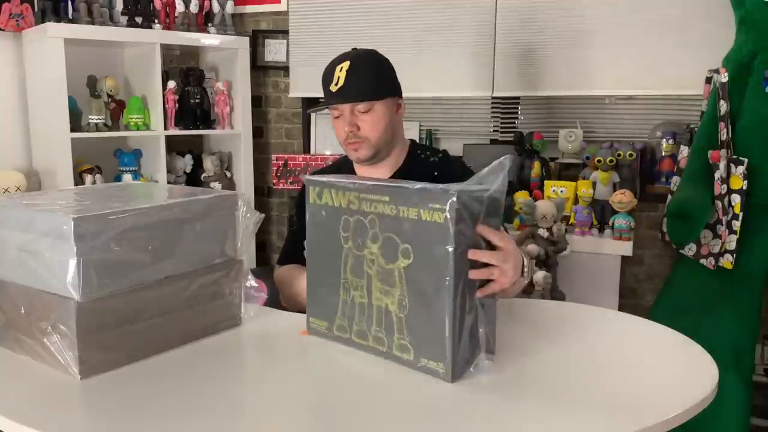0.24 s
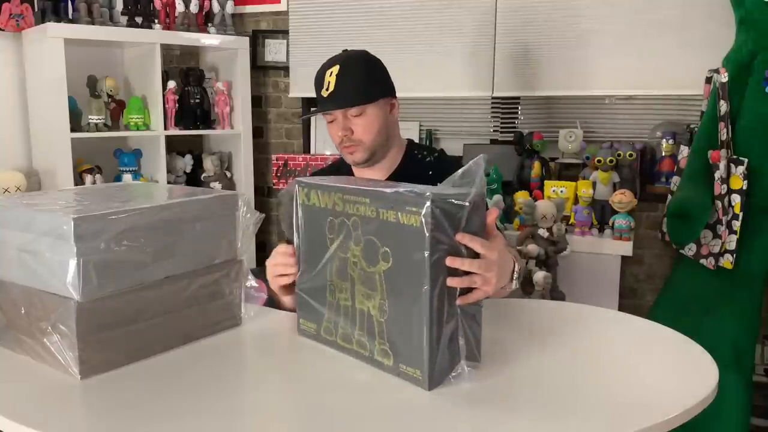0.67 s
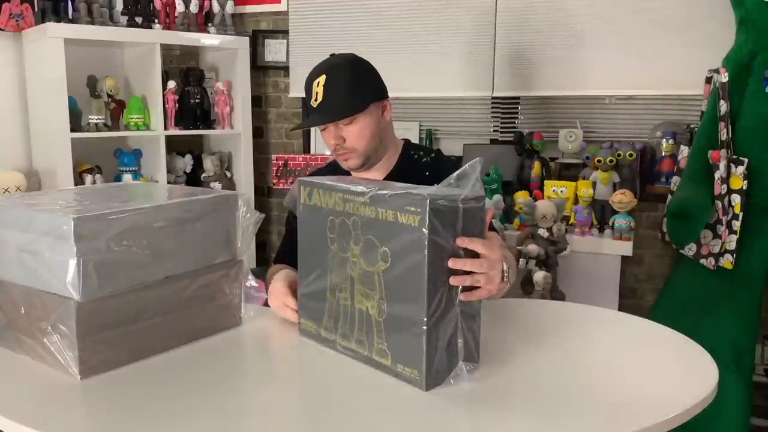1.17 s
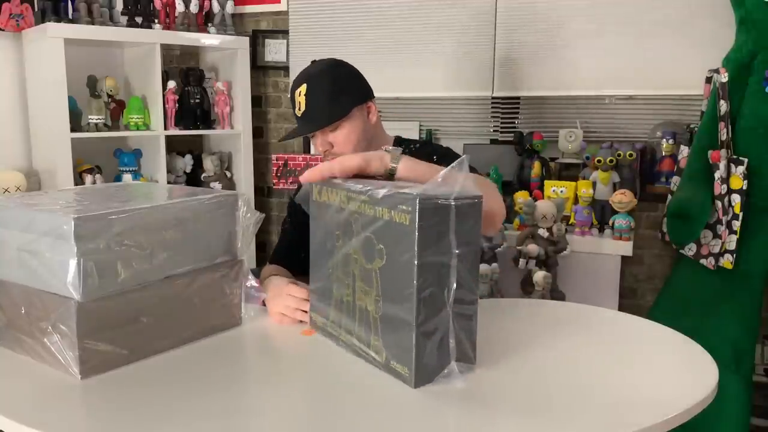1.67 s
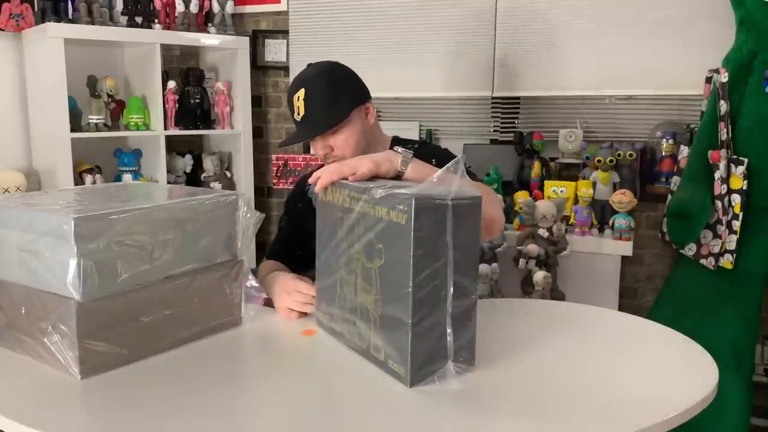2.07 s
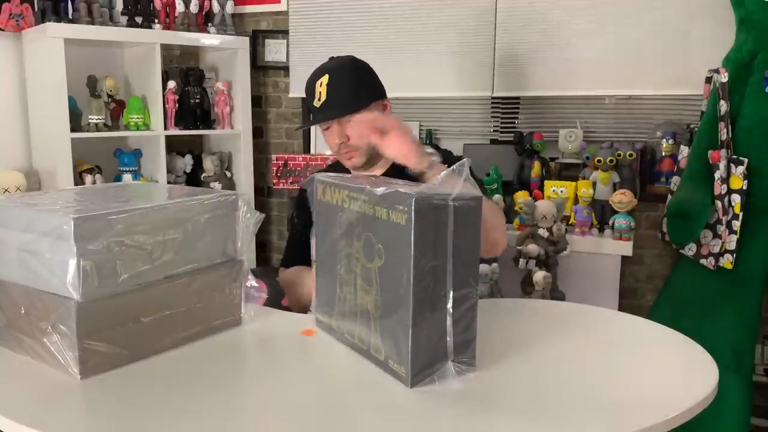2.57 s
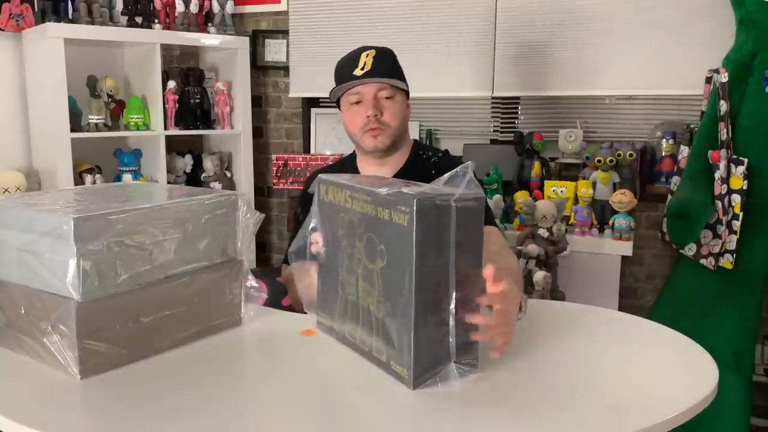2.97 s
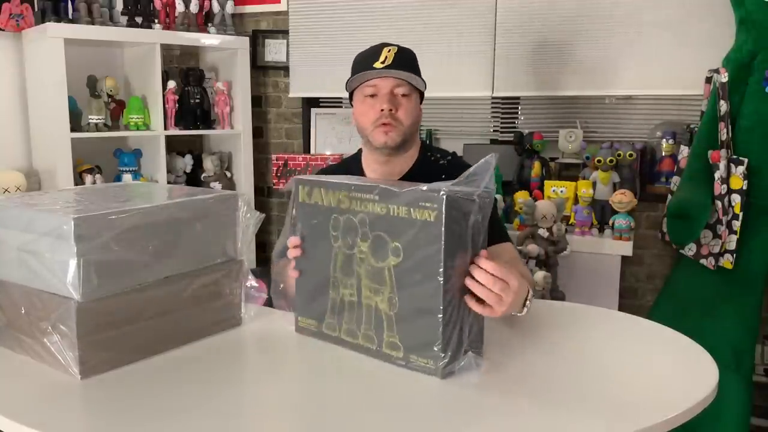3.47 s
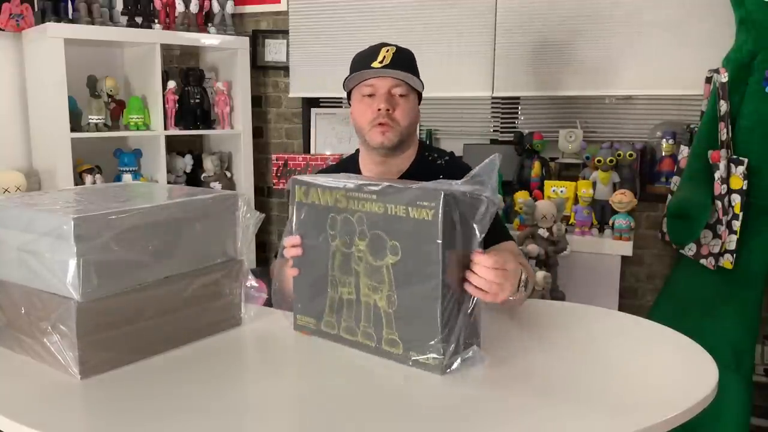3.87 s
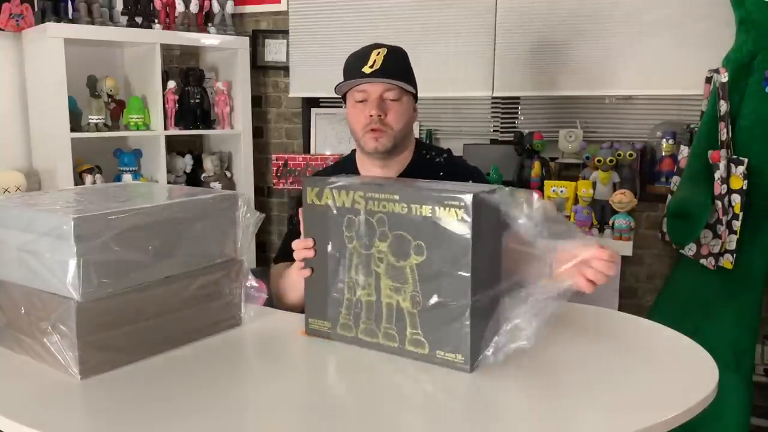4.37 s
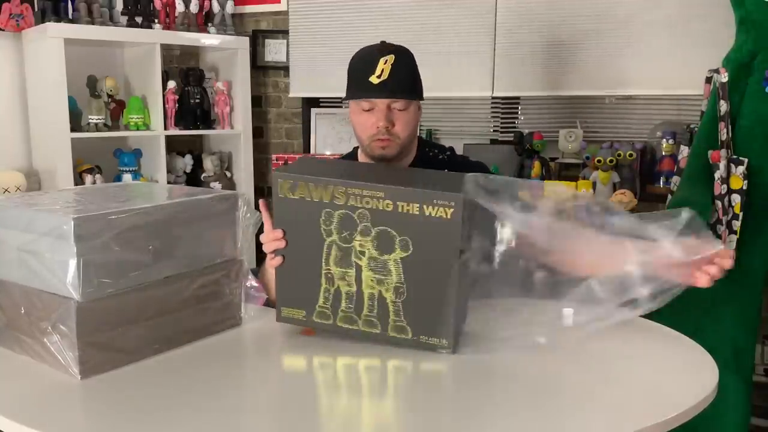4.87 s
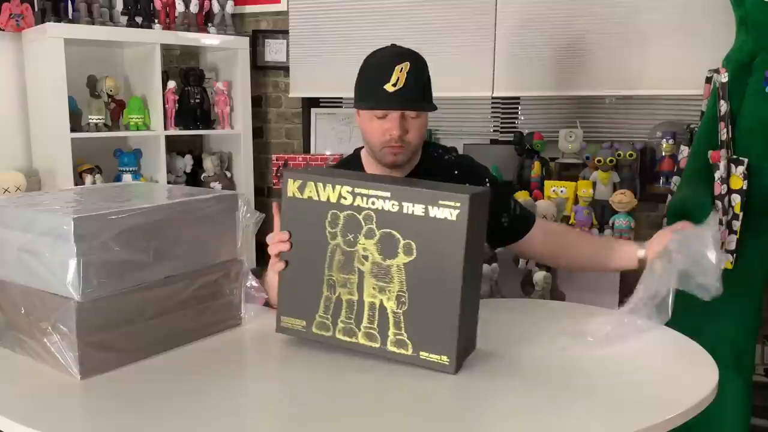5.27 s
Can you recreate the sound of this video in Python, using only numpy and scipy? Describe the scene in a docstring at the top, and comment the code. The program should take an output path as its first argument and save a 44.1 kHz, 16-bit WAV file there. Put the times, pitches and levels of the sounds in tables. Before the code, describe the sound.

Thin clear plastic crinkles and snaps around a cardboard box that thuds on a table, sharp cracks midway, then two long rustling pulls.

```python
"""Close stereo microphones at a table in a small room, over low ventilation rumble and a faint mains hum.
At once a large cardboard box is turned: it knocks on the table and booms softly under the hands.
Its clear plastic bag crinkles in tiny buckles, hisses in fine creases and snaps as its folds flip.
Just after 2 s a run of sharp, hard cracks rings out; from 4 s the bag is drawn off in two long pulls, with
one more crack between them. The rustle thins out and two last knocks, close together, end the scene."""
import sys
import numpy as np
from scipy import signal
from scipy.fft import rfft, irfft, next_fast_len
from scipy.io import wavfile
from scipy.ndimage import map_coordinates

SR = 44100
rng = np.random.default_rng(int(sys.argv[2]) if len(sys.argv) > 2 else 0)


def waveform_to_disk(signal):
    """Save audio, clipped to [-1, 1], as 16-bit WAV at the path in sys.argv[1]."""
    frames = np.transpose(np.atleast_2d(signal))
    scaled = np.clip(frames, -1, 1) * 32767
    samples = np.round(scaled).astype(np.int16)
    wavfile.write(sys.argv[1], SR, samples)


N = 244314  # samples

# Layer levels called "level before trim" are lowered by a fixed trim in the function that uses them.

# ventilation rumble, spectrum shape: pitch_hz [Hz], level_db [dB]
AIR_SPECTRUM = [(12, -54), (20, -10.5), (65, 3.5), (107, -3.5), (142, -8), (210, -5), (285, -6.5),
                (328, -9.5), (446, -12.5), (780, -21), (1060, -17.5), (1370, -25.5), (14700, -60),
                (16000, -65)]

# hands shifting their grip on the bag: start_s [s], length_s [s], crinkle_db [dB, level before trim],
# fizz_db [dB relative to the crinkle]
GRIP_EVENTS = [(0.0, 0.29, -49.5, 1), (0.383, 0.38, -55.5, 1), (0.57, 0.18, -52, -9), (0.784, .08, -49, 0),
               (0.918, 0.17, -51.5, 4), (1.087, 0.15, -48, -0.5), (1.185, 0.072, -50, 5.5),
               (1.337, 0.05, -47.5, -1.5), (1.475, .12, -57, -1.5), (1.616, 0.28, -54, -1),
               (1.767, 0.18, -55.5, -17), (2.014, 0.13, -48, -8), (2.109, 0.2, -50, -4.5),
               (2.173, 0.03, -45, 2), (2.246, 0.07, -37, -25), (2.662, 0.09, -58, -8),
               (2.999, 0.26, -57.5, -2), (3.205, 0.44, -54.5, -3.5), (3.368, 0.12, -46.5, -2),
               (3.492, 0.12, -53.5, -6), (3.69, 0.096, -46.5, -3), (3.769, 0.2, -50.5, -0.5),
               (5.15, 0.2, -53, -1.5), (5.354, 0.19, -56.5, 1.5)]
# the bag drawn off in two long pulls: time_s [s], crinkle_db [dB, level before trim],
# fizz_db and rub_db [dB relative to the crinkle]
FIRST_PULL_CURVE = [(3.96, -52, -8, 0.5), (4.03, -45.5, -1, -1.5), (4.085, -38, -3, -3),
                    (4.14, -40.5, -2, -1), (4.209, -41.5, 0.5, -5), (4.28, -41.5, -3, 0),
                    (4.419, -49, 6, -2)]
SECOND_PULL_CURVE = [(4.5, -42, 2, -5), (4.59, -47.5, -2.5, 0), (4.68, -41, -1.5, -4),
                     (4.875, -33, -1.5, -3), (5.005, -32, -6, -2.5), (5.05, -42.5, -4, 3.5),
                     (5.09, -55, 1, -3), (5.17, -58, -3, -12)]
# spectrum shapes of wide folds, fine creases and film rubbing on cardboard: pitch_hz [Hz], level_db [dB]
FOLD_SPECTRUM = [(200, -59), (700, -0.5), (1500, -1.5), (2800, -2), (4500, -2), (7000, -1), (10000, -45),
                 (16000, -27)]
FIZZ_SPECTRUM = [(1500, -22.5), (4500, -2.5), (7000, -8), (8300, 0.5), (10000, -2), (13000, 1), (14600, -3),
                 (16000, 0.5)]
RUB_SPECTRUM = [(60, -17), (120, -10), (160, -1), (210, 1.5), (290, -1.5), (420, -4.5), (560, -5.5),
                (750, -8.5), (1150, -9.5), (2500, -29.5), (6000, -45)]

# the box meeting the table: start_s [s], box_db [dB], favoured_hz [Hz], table_db [dB], clack_db [dB]
KNOCK_EVENTS = [(0.0155, -10.5, 239, -38, -22), (0.03, -12, 225, -43, -55), (0.074, -20.5, 255, -50, -54),
                (0.087, -37.5, 250, -45, -34.5), (0.096, -16.5, 240, -36, -33.5),
                (0.142, -26, 190, -50, -46), (0.196, -33, 235, -61, -59), (0.371, -31, 250, -45, -44),
                (0.816, -37.5, 223, -56, -39), (1.204, -29, 225, -62, -58), (1.512, -35.5, 250, -63, -43.5),
                (1.652, -39.5, 250, -54, -39.5), (1.785, -29.5, 226, -54, -42),
                (1.852, -25.5, 280, -43.5, -49), (2.1903, -28, 200, -34, -14), (2.203, -17, 180, -33, -28),
                (2.272, -23, 165, -52, -46), (2.376, -25, 190, -41, -45), (2.6242, -30, 320, -43.5, -44),
                (2.671, -30, 240, -41.5, -37.5), (4.4326, -16.5, 195, -38, -19.5),
                (5.4713, -25, 260, -32.5, -39.5), (5.484, -25.5, 220, -30.5, -38)]
# modes of the hollow box and of the table top: pitch_hz [Hz], level_db [dB], t60_s [s]
BOX_MODES = [(139, -15, 0.11), (168, -3.5, 0.096), (209, -2, 0.066), (250, 0.5, 0.077), (299.4, -1, 0.063),
             (351.5, -7.5, 0.06), (467.4, -3.5, 0.061)]
TABLE_MODES = [(542, 0.5, 0.069), (665, -4, 0.12), (751, -7.5, 0.13), (1074, -13, 0.096)]
# clack of the edge, spectrum shape: pitch_hz [Hz], level_db [dB]
CLACK_SPECTRUM = [(100, -28), (300, 5), (500, 9.5), (900, 1), (1250, 3.5), (1700, 2.5), (2400, -4),
                  (3500, -12), (6000, -18.5), (15000, -35)]

# hands and weight flexing the large panels, and the table top flexing in the deepest booms (60-80 Hz): start_s
# [s], level_db [dB, level before trim], # panel_hz [Hz], rise_s [s, time constant]
PAT_EVENTS = [(0.017, -32, 60.4, 0.0044), (2.624, -19, 179.8, 0.007), (3.046, -26.5, 191.5, 0.0018),
              (3.164, -23.5, 187, 0.017), (3.711, -28, 177, 0.0082), (4.435, -35, 69.8, 0.0019),
              (5.474, -42, 78, 0.0042)]

# the loudest creases snapping through: start_s [s], tick_db [dB], pop_db [dB], pop_hz [Hz]
SNAP_EVENTS = [(0.1347, -34, -33.5, 3640), (0.2078, -31.5, -45, 4300), (0.2457, -38.5, -40, 4030),
               (0.5122, -43.5, -36.5, 2616), (0.6656, -39.5, -47, 1690), (0.8201, -34, -38, 3800),
               (0.8287, -40, -45, 2600), (0.9433, -36, -44, 2820), (1.1078, -33.5, -48, 2500),
               (1.1366, -35, -42, 4000), (1.179, -46, -43, 2400), (1.2066, -31.5, -38.5, 3570),
               (1.3463, -32, -44, 2500), (1.3592, -46, -42.5, 2090), (1.4919, -43, -41.5, 1800),
               (1.6507, -45, -42.5, 1720), (2.0052, -58, -43, 3040), (2.0131, -36, -44, 4000),
               (2.0252, -55, -42, 2320), (2.0671, -70, -43, 2900), (2.0861, -48, -32, 2140),
               (2.107, -30.5, -41, 3720), (2.1293, -35, -45, 4100), (2.1681, -30.5, -53, 3200),
               (2.395, -44, -60, 3000), (2.7612, -47, -55, 3920), (3.06, -53, -48, 3040),
               (3.1376, -48, -55, 1600), (3.2209, -40.5, -43.5, 3600), (3.399, -38, -40, 4300),
               (3.4133, -47, -33.5, 3060), (3.4215, -47, -52, 2700), (3.4686, -34, -37.5, 4400),
               (3.4987, -39, -40, 4450), (3.5338, -37.5, -34.5, 2660), (3.6512, -62, -42, 3120),
               (3.7053, -38, -36, 3100), (3.7789, -34, -30, 3470), (3.8231, -34.5, -58, 3400),
               (3.9736, -40, -39, 2500), (4.0136, -42.5, -38, 2700), (4.0599, -40, -30.5, 3040),
               (4.0857, -38, -33, 2720), (4.094, -41, -36, 3300), (4.1698, -38, -36.5, 3130),
               (4.1835, -38, -52, 3300), (4.2145, -38, -51, 3500), (4.2979, -29.5, -58, 2700),
               (4.3714, -38, -46, 3500), (4.542, -36, -56, 2310), (4.6243, -41, -55, 3500),
               (4.7256, -46, -34, 3500), (4.773, -47, -50, 3500), (4.8099, -40, -44, 3500),
               (4.8715, -43, -26.5, 4160), (4.883, -38, -39, 3300), (4.966, -31, -33, 3500),
               (4.9689, -31, -26.5, 2740), (5.006, -44, -31.5, 3260), (5.073, -39.5, -44, 3300),
               (5.2354, -43, -48, 3400), (5.3691, -40, -43, 1710)]
# the sharp tick, spectrum shape: pitch_hz [Hz], level_db [dB]
TICK_SPECTRUM = [(800, -16), (2500, -19), (5000, -5.5), (9200, 3.5), (13200, 1), (16000, -2)]
# the duller pop, spectrum shape: pitch_ratio [multiple of pop_hz], level_db [dB]
POP_SPECTRUM = [(.14, -20.5), (.45, -8.5), (1, 0), (1.45, -3.5), (2.4, -16), (5, -41)]

# sharp, hard cracks, perhaps a small tool dropped on the table: start_s [s],
# clap_db [dB, level before trim], bright_hz [Hz, treble corner], rise_s [s, time constant],
# t60_s [s], ring_db [dB, level before trim]
CRACK_EVENTS = [(2.1901, -1.5, 15900, 0.00046, 0.0069, -29), (2.191, -24.5, 14000, 0.0088, 0.18, -35),
                (2.204, -17, 6000, 0.0005, 0.011, -52), (2.2639, -14, 4000, 0.0016, 0.035, -41),
                (2.2700, -7, 4370, 0.0003, 0.0083, -34), (2.2726, -7.5, 4000, 0.00037, 0.0096, -41),
                (4.4325, -12.5, 3560, 0.00036, 0.063, -54)]
# the clap of a crack, spectrum shape: pitch_hz [Hz], level_db [dB]
CRACK_SPECTRUM = [(100, -20), (450, -4), (750, 0), (1100, -8), (1450, 3.5), (1700, -3.5), (2100, 0),
                  (2550, 0), (4000, -3.5), (6500, -6), (9000, -2.5), (13500, 3.5), (16000, -3)]
# the hard, hollow ring that a crack leaves: pitch_hz [Hz], level_db [dB], t60_s [s]
CRACK_RING_MODES = [(1374, -3, 0.15), (1638, -6, 0.15), (1880, -4.5, .2), (2030, -2.5, 0.094),
                    (2555, -2.5, 0.14), (2910, -12, 0.13), (3160, -17, 0.21), (3540, -8, 0.16),
                    (3604, -4, .25), (4000, -7, 0.17), (4360, -11, .2)]

# the room's decay: pitch_hz [Hz], t60_s [s]
ROOM_DECAY = [(150, 0.33), (500, 0.28), (2000, 0.34), (6000, 0.3), (14000, 0.25)]
# the room's strength: pitch_hz [Hz], level_db [dB]
ROOM_LEVEL = [(150, 2.5), (400, -2), (1000, 1), (3000, 5.5), (8000, 3.5), (14000, -2)]
# how alike the two microphones hear diffuse sound: pitch_hz [Hz], likeness [0 to 1]
STEREO_LIKENESS = [(60, 0.91), (250, 0.94), (500, 0.54), (1000, 0.04), (2500, 0.017), (12000, 0.017)]
# left-right tilt of everything but the background: pitch_hz [Hz], pan_db [dB, left minus right]
FOREGROUND_PAN = [(300, -0.5), (1500, 2), (2500, 2), (4500, 0), (12000, -0.7)]
# fixed treble colour, a narrow gap near 11.3 kHz and a fall above 15 kHz: pitch_hz [Hz], level_db [dB]
TREBLE_COLOUR = [(10000, 0), (10700, -7.5), (11300, -30.5), (12100, -3), (14600, -1), (15500, -21)]

# how far into its length a grip peaks [share], and the exponent on its shape (below 1, it widens the flanks)
GRIP_PEAK_SHARE, GRIP_SHARPNESS = 0.31, 0.59
# the bag settling between grips: crinkle [dB before trim]; fizz and rub [dB relative to the crinkle]
REST_DB, REST_FIZZ_DB, REST_RUB_DB = -66, -9, 2.5
GRIP_RUB_DB = -5.5  # film rubbing on cardboard during a grip, relative to the crinkle
# crinkle level [dB before trim] at which clumps are half merged, and the share they can reach
MERGE_DB, MERGE_SHARE = -40, 0.67
SPOT_DB_PER_OCTAVE = 4.5  # modes away from the favoured pitch are driven less
CONTACT_S = 0.0028  # cardboard gives way, so a knock builds with this time constant
BOX_LOW_HZ = 136  # the box radiates little below this
# bending waves cross the board in BEND_S at BEND_HZ, less a constant BEND_S / 2; higher ones come sooner
BEND_S, BEND_HZ = 0.0033, 1005
PANEL_CYCLES, OVERTONE_CYCLES = 23.6, 49  # swings until a boom and its overtone fall by 60 dB
SMALL_SNAPS_PER_S, SMALL_POP_HZ = 22, 2600  # lesser creases: mean rate, and median pitch of their pops
# their levels [dB] when the crinkle stands at USUAL_CRINKLE_DB [dB before trim]
USUAL_CRINKLE_DB, SMALL_TICK_DB, SMALL_POP_DB = -52, -65.5, -51.5
SMALL_SNAP_GROWTH, SMALL_SNAP_SCATTER_DB = 0.51, 3  # dB gained per dB of crinkle; random spread
SMALL_SNAP_CROWDING = 0.4  # dB of rate gained per dB of crinkle
SNAP_S = 0.0022  # the span over which a snap's level is counted
CRACK_ROUGH_DB = 3  # scale of the uneven bursts within a crack
FILM_DRAWN_OUT_DB = -0.5  # change of the film, direct and by way of the room, over the first pull
TOP_HZ = 15700  # upper band limit


def amp(db):
    """Decibels to gain."""
    return 10 ** (np.asarray(db) / 20)


def unit(x):
    """Scale to rms 1."""
    return x / np.sqrt(np.mean(x ** 2) + 1e-20)


def along(points, hz):
    """Read a (Hz, value) curve on a log-frequency axis."""
    f, v = np.transpose(points)
    return np.interp(np.log(hz + 1), np.log(f + 1), v)


def curves(rows):
    """Draw each dB column over time, one value per sample; -120 dB outside the rows."""
    s, *columns = np.transpose(rows)
    t = np.arange(N) / SR
    return [np.interp(t, s, column, left=-120, right=-120) for column in columns]


def wobble(rate):
    """Draw a smooth random curve with the given number of knots a second."""
    knots = rng.standard_normal(int(N * rate / SR) + 4)
    return map_coordinates(knots, [np.arange(N) * rate / SR])


def filtered(x, response):
    """Multiply the spectrum of x by a response of frequency."""
    size = x.shape[-1]
    padded = next_fast_len(size + 8192)
    spectrum = rfft(x, padded) * response(np.fft.rfftfreq(padded, 1 / SR))
    return irfft(spectrum, padded)[..., :size]


def coloured(x, spectrum, size=1024):
    """Pass x through a causal minimum-phase filter of unit energy with the given spectrum shape."""
    cepstrum = irfft(np.log(amp(along(spectrum, np.fft.rfftfreq(size, 1 / SR)))))
    # folding the cepstrum onto positive times makes the filter minimum-phase
    cepstrum[1:size // 2] *= 2
    cepstrum[size // 2 + 1:] = 0
    kernel = irfft(np.exp(rfft(cepstrum)))
    kernel = kernel / np.linalg.norm(kernel)
    return filtered(x, lambda hz: rfft(kernel, 2 * (len(hz) - 1)))


def fade(t, t60):
    """Decay exponentially, by 60 dB in t60."""
    return np.exp(-np.log(1000) * t / t60)


def swell(t, rise, t60):
    """Rise and decay with a peak of 1."""
    shape = (1 - np.exp(-t / rise)) * fade(t, t60)
    return shape / shape.max()


def burst(shape):
    """Noise under an envelope, its spectrum evened out so that no pitch stands out."""
    z = rfft(rng.standard_normal(len(shape)) * shape)
    even = irfft(z / (np.abs(z) + 1e-12), len(shape)) * shape ** (1 / 4)
    return even * np.linalg.norm(shape) / np.linalg.norm(even)


def ring(modes, t, detune):
    """Struck modes, with slightly different strengths and pitches at every blow."""
    hz, level, t60 = np.transpose(modes)[:, :, None]
    strength_db, shift = rng.standard_normal((2, len(modes), 1))
    swings = np.sin(2 * np.pi * hz * (1 + detune * shift) * t)
    return np.sum(amp(level + strength_db) * swings * fade(t, t60), axis=0)


def add(track, s, sound):
    """Mix a sound into the track at time s."""
    part = track[max(round(s * SR), 0):][:len(sound)]
    part += sound[:len(part)]


def diffuse(pair):
    """Two unrelated signals as two close microphones hear them: alike in the bass."""
    turn = lambda hz: np.arccos(np.clip(along(STEREO_LIKENESS, hz), -1, 1)) / 2
    mid, side = filtered(pair, lambda hz: np.array([np.cos(turn(hz)), np.sin(turn(hz))]))
    return np.array([mid + side, mid - side])


def background():
    """Low ventilation rumble as shaped diffuse noise, and mains hum as one slowly wavering sine."""
    noise = diffuse(rng.standard_normal((2, N)))
    air = unit(filtered(noise, lambda hz: amp(along(AIR_SPECTRUM, hz))))
    hum = np.sin(2 * np.pi * 51.0 * np.arange(N) / SR) * amp(-64.5 + 1.8 * wobble(3.5))
    return amp(-48.5) * air + hum


def handling():
    """Crinkle, fizz and rub in dB: grips swell fast and relax slowly, pulls drag the film along the box."""
    t = np.arange(N) / SR
    rest_db = np.array([[REST_DB], [REST_DB + REST_FIZZ_DB], [REST_DB + REST_RUB_DB]])
    power = amp(rest_db) ** 2 * np.ones(N)
    for s, length, db, fizz_db in GRIP_EVENTS:
        age = np.maximum(t - s, 0) / (GRIP_PEAK_SHARE * length)
        squeeze = (age * np.exp(1 - age)) ** GRIP_SHARPNESS
        power += (squeeze * amp([[db], [db + fizz_db], [db + GRIP_RUB_DB]])) ** 2
    pull_db, fizz_db, rub_db = curves(list(FIRST_PULL_CURVE) + list(SECOND_PULL_CURVE))
    power += amp(np.array([pull_db, pull_db + fizz_db, pull_db + rub_db])) ** 2
    return 10 * np.log10(power)


def buckles(rate, scatter_db, pitch_hz, spread, cycles, clump_db, size=128):
    """Tiny buckles of film: damped ticks of random pitch (spread in octaves) and size, in clumps."""
    count = int(rate * N / SR)
    place, pitch, loudness, sign = rng.random((count, 4)).T
    # ticks fall more often where the clump curve is high
    clumps = np.cumsum(amp(clump_db * wobble(45)))
    start = np.searchsorted(clumps, place * clumps[-1])
    hz = (pitch_hz * 2 ** (spread * (2 * pitch - 1)))[:, None]
    strength = amp(scatter_db * loudness ** 2) * np.sign(sign - .5)
    turns = hz * np.arange(size) / SR
    ticks = strength[:, None] * np.sqrt(hz) * np.sin(2 * np.pi * turns) * fade(turns, cycles)
    samples = start[:, None] + np.arange(size)
    return unit(np.bincount(samples.ravel(), ticks.ravel(), N)[:N])


def film(crinkle_db, fizz_db, rub_db):
    """Wide folds crinkle low, fine creases fizz high, and the dragged film drives the cardboard."""
    clumps = amp(3.1 * wobble(90))
    # the harder the film is worked, the more the clumps merge into a dense, even crackle
    merged = MERGE_SHARE / (1 + amp(-2 * (crinkle_db - MERGE_DB)))
    blend = lambda loose, dense: np.sqrt(1 - merged) * clumps * loose + np.sqrt(merged) * dense
    folds = blend(
        buckles(rate=340, scatter_db=15.5, pitch_hz=2930, spread=1.17, cycles=9.0, clump_db=5),
        buckles(rate=700, scatter_db=13.5, pitch_hz=2900, spread=1.68, cycles=4.4, clump_db=2.5))
    creases = blend(
        buckles(rate=1500, scatter_db=14.5, pitch_hz=9300, spread=0.25, cycles=1.24, clump_db=5, size=32),
        buckles(rate=4000, scatter_db=15, pitch_hz=9600, spread=0.59, cycles=2.2, clump_db=1.5, size=32))
    friction = blend(*rng.standard_normal((2, N)))
    # trims: crinkle 5 dB, rub 1.5 dB
    crinkle = unit(coloured(folds, FOLD_SPECTRUM)) * amp(crinkle_db - 5.0)
    fizz = unit(coloured(creases, FIZZ_SPECTRUM)) * amp(fizz_db)
    rub = unit(coloured(friction, RUB_SPECTRUM)) * amp(rub_db - 1.5)
    return crinkle + fizz + rub


def radiated(x, low_hz):
    """A panel moves little air below its lowest mode."""
    return signal.sosfilt(signal.butter(4, low_hz, "highpass", fs=SR, output="sos"), x)


def bent(x):
    """A click spreads on its way through a board into a quick downward chirp."""
    delay_turns = lambda hz: BEND_S * (2 * np.sqrt(hz * BEND_HZ) - hz / 2)
    return filtered(x, lambda hz: np.exp(-2j * np.pi * delay_turns(hz)))


def knocks():
    """Each contact thumps the hollow box and rings the harder table top, with a short clack from the edge."""
    thumps, clacks, t = np.zeros(N), np.zeros(N), np.arange(SR // 3) / SR
    for s, box_db, spot_hz, table_db, clack_db in KNOCK_EVENTS:
        box_modes = [(hz, db - SPOT_DB_PER_OCTAVE * abs(np.log2(hz / spot_hz)), t60)
                     for hz, db, t60 in BOX_MODES]
        box = amp(box_db) * ring(box_modes, t, detune=0.02)
        table = amp(table_db) * ring(TABLE_MODES, t, detune=0.018)
        add(thumps, s, (box + table) * (1 - np.exp(-t / CONTACT_S)))
        blow = 7.25 * (t == 0)  # a single-sample click
        scuff = 0.46 * burst(swell(t, 0.00051, 0.014))
        add(clacks, s, amp(clack_db) * coloured(blow + scuff, CLACK_SPECTRUM))
    return radiated(thumps, BOX_LOW_HZ) + bent(clacks)


def pats():
    """A soft push or a set-down booms one mode of a panel or of the table top, and an overtone: lower booms
    ring longer, slow pushes are purer."""
    track, t = np.zeros(N), np.arange(SR // 2) / SR
    for s, db, hz, rise in PAT_EVENTS:
        boom = np.sin(2 * np.pi * hz * t) * swell(t, rise, PANEL_CYCLES / hz)
        overtone_hz = 1.496 * hz
        overtone = np.sin(2 * np.pi * overtone_hz * t) * swell(t, 0.0014, OVERTONE_CYCLES / overtone_hz)
        overtone *= amp(-2.0 - 900 * rise)
        add(track, s, amp(db - 2.5) * radiated(boom + overtone, 0.71 * hz))  # trim: 2.5 dB
    return track


def small_snaps(crinkle_db):
    """Lesser creases flip at random, louder and closer together where the film is worked harder."""
    count = int(SMALL_SNAPS_PER_S * N / SR)
    chance = np.cumsum(amp(SMALL_SNAP_CROWDING * crinkle_db))
    at = np.searchsorted(chance, rng.random(count) * chance[-1])
    work_db = SMALL_SNAP_GROWTH * (crinkle_db[at] - USUAL_CRINKLE_DB)
    tick, pop, pitch = rng.standard_normal((count, 3)).T
    tick_db = SMALL_TICK_DB + work_db + SMALL_SNAP_SCATTER_DB * tick
    pop_db = SMALL_POP_DB + work_db + SMALL_SNAP_SCATTER_DB * pop
    pop_hz = SMALL_POP_HZ * np.exp(.27 * pitch)
    return list(zip(at / SR, tick_db, pop_db, pop_hz))  # same columns as SNAP_EVENTS


def snaps(rows):
    """A crease flips with a sharp tick; the fold around it pops at its own pitch and sets off weaker ticks."""
    track, t = np.zeros(N), np.arange(SR // 20) / SR
    at_level = lambda x, db: amp(db) * np.sqrt(SNAP_S * SR) * x / np.linalg.norm(x)
    for s, tick_db, pop_db, pop_hz in rows:
        after = (rng.random(len(t)) < .04) * fade(t, 0.069)  # sparse, dying impulses
        tick = coloured(burst(swell(t, 0.0004, 0.005) + 0.1 * after), TICK_SPECTRUM)
        pop_spectrum = np.array(POP_SPECTRUM) * [pop_hz, 1]
        pop = coloured(burst(swell(t, 0.0006, .009) + 0.55 * after), pop_spectrum)
        add(track, s, at_level(tick, tick_db) + at_level(pop, pop_db))
    return track


def cracks():
    """A hard clap breaks up roughly and leaves a short ring."""
    track, t = np.zeros(N), np.arange(SR // 3) / SR
    for s, db, bright_hz, rise, t60, ring_db in CRACK_EVENTS:
        shape = swell(t, rise, t60)
        # roughness grows as the clap dies away; the overall energy is kept
        rough_db = CRACK_ROUGH_DB * wobble(703)[:len(t)] * (1.5 - fade(t, 0.022))
        broken = shape * amp(rough_db)
        broken *= np.linalg.norm(shape) / np.linalg.norm(broken)
        clap = coloured(burst(broken), CRACK_SPECTRUM)
        softened = filtered(clap, lambda hz: 1 / (1 + 1j * hz / bright_hz))
        # trims: clap 8 dB, ring 6 dB
        add(track, s, amp(db - 8) * softened)
        add(track, s, amp(ring_db - 6) * ring(CRACK_RING_MODES, t, detune=.001))
    return track


def placed(x, lead_s, pan_db):
    """Set time and level between the microphones: positive values make the left one earlier and louder."""
    sides = np.array([[.5], [-.5]])
    return filtered(x, lambda hz: amp(pan_db * sides) * np.exp(2j * np.pi * hz * lead_s * sides))


def room(x, count=80):
    """The room answers; each short slice gets a fresh random tail, so no pitch stands out."""
    out, size = np.zeros((2, N + SR)), N // count + 1
    # a stretch of diffuse noise in the room's colour
    hz, t, z = signal.stft(rng.standard_normal((2, 3 * SR)), SR, nperseg=256)
    walls = diffuse(signal.istft(z * amp(along(ROOM_LEVEL, hz))[:, None], SR, nperseg=256)[1])
    z = signal.stft(walls, SR, nperseg=256)[2]
    # the decay at each pitch, scaled to constant energy
    t = t[t < .4]
    shape = fade(t, along(ROOM_DECAY, hz)[:, None])
    shape = shape * (1 - np.exp(-t / 0.00037)) * (1 + 0.44 * fade(t, 0.069))
    shape /= np.sqrt(np.sum(shape ** 2, axis=1, keepdims=True) * t[1] * SR)
    for start in range(0, N, size):
        pick = rng.integers(z.shape[2] - len(t))
        tail = signal.istft(z[:, :, pick:pick + len(t)] * shape, SR, nperseg=256)[1]
        wet = signal.fftconvolve(x[None, start:start + size], tail, axes=1)
        out[:, start:start + wet.shape[1]] += wet
    return out[:, :N]


def scene():
    """Film, box and cracks in front of the microphones, with the room's answer and the background."""
    crinkle_db, fizz_db, rub_db = handling()
    rustle = film(crinkle_db, fizz_db, rub_db)
    hard, soft = knocks(), pats()
    ticks = snaps(list(SNAP_EVENTS) + small_snaps(crinkle_db))
    claps = cracks()
    pull_span_s = [FIRST_PULL_CURVE[0][0], FIRST_PULL_CURVE[-1][0]]
    drawn_out = np.interp(np.arange(N) / SR, pull_span_s, [0, 1])
    rustle = amp(FILM_DRAWN_OUT_DB * drawn_out) * rustle
    direct = (placed(rustle + ticks, lead_s=0.00001, pan_db=0.5)
              + placed(claps, lead_s=-0.000012, pan_db=2.5)
              + placed(hard + soft, lead_s=-0.000036, pan_db=0.9))
    sent = rustle + amp(-6.0) * ticks + amp(0.5) * claps + amp(-2.5) * hard + amp(-8.0) * soft
    sides = np.array([[.5], [-.5]])
    foreground = filtered(direct + room(sent), lambda hz: amp(along(FOREGROUND_PAN, hz) * sides))
    return foreground + background()


def record(dry):
    """A fixed treble colour, then a very steep slope that removes what lies above the band limit."""
    heard = filtered(dry, lambda hz: amp(along(TREBLE_COLOUR, hz)))
    return filtered(heard, lambda hz: 1 / np.sqrt(1 + (hz / TOP_HZ) ** 120))


dry = scene()
out = record(dry)
waveform_to_disk(out)
```